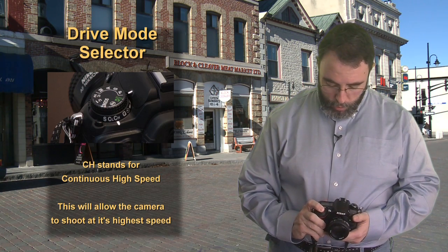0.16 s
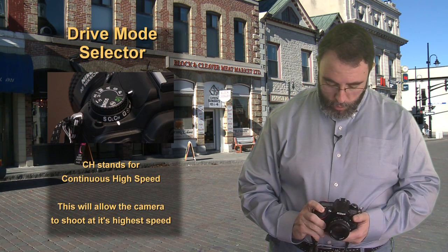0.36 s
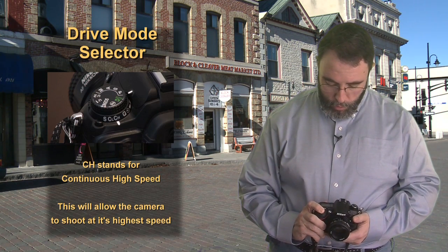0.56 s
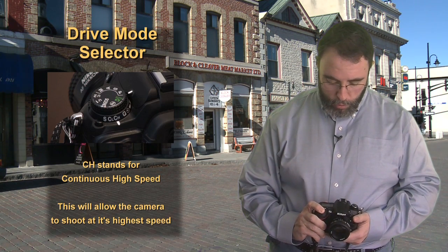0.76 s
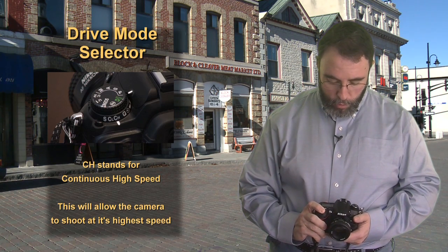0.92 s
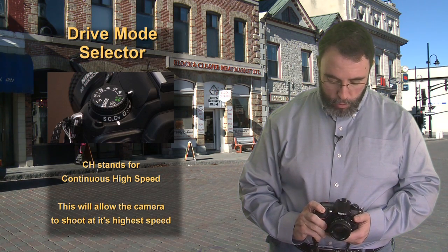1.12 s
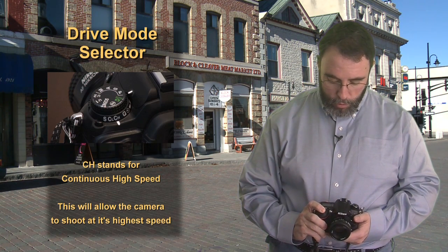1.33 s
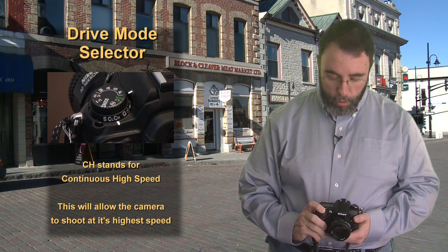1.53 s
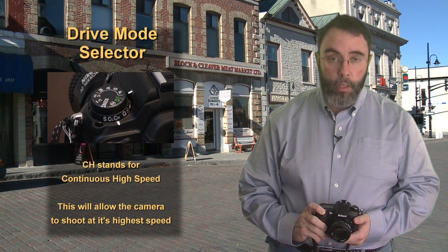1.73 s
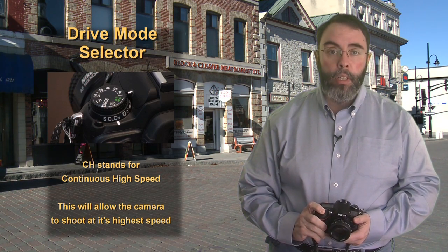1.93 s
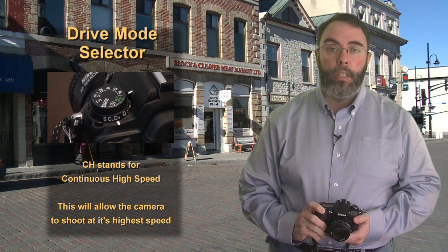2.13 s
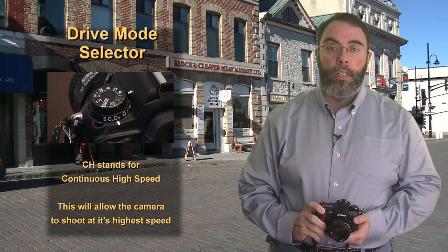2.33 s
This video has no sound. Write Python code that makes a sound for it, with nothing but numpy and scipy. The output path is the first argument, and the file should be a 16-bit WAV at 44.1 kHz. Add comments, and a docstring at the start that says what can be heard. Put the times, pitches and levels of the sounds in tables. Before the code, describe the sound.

A camera shutter fires a burst of ten shots, close to the microphone and slightly to the right. The tail of one clack sounds at the very start, with the next at 0.3 and 0.55 seconds. From there the crisp double clacks of shutter and mirror repeat evenly, about five a second, ending near 2 seconds. The room is dry, with only faint background noise.

```python
"""Reflex camera burst, close up

A dry room, a clip-on microphone close to a reflex camera firing about five frames a second.
Every frame is the same chain of contacts: magnet tick, latch, mirror up, two shutter curtains,
then the motor recocks and the mirror drops back. The body rings and the room answers briefly.
The camera sits a little to the right, over faint room tone."""
import sys
import numpy as np
from scipy import signal
from scipy.fft import rfft, irfft, next_fast_len
from scipy.io import wavfile
from scipy.ndimage import uniform_filter1d

SR = 44100
rng = np.random.default_rng(int(sys.argv[2]) if len(sys.argv) > 2 else 0)


def output_pcm(signal):
    """Save a mono or channel-first signal as 16-bit PCM at the path in sys.argv[1].

    Samples are clipped to [-1, 1] before scaling.
    """
    pcm = np.clip(np.atleast_2d(signal).T, -1, 1) * 32767
    wavfile.write(sys.argv[1], SR, np.round(pcm).astype(np.int16))


N = 104649
SIZE = 16384  # samples in one contact or impulse response

# One row a frame; delays count from the latch, mirror levels from level_db:
# latch_s, level_db, mirror_up_delay_s, mirror_up_db, shutter_delay_s, mirror_down_delay_s, mirror_down_db
FRAME_CUES = [(-.073, 0, .009, 0, 0.014, .0775, -2), (0.3005, 1, 0.0082, -1, 0.021, 0.073, -2),
              (0.5588, 0.5, 0.0083, 1, .0222, 0.074, -1.5), (0.7533, 1, .0088, -2, 0.022, 0.076, -2.5),
              (0.9446, 0.5, 0.0092, 1.5, 0.022, 0.076, -2), (1.1354, 1, .0088, 1, 0.022, 0.075, -0.5),
              (1.3203, 0.5, .0090, -1, .0227, .0772, 0), (1.5069, 1, 0.0089, 1, 0.023, 0.076, -2),
              (1.7017, 1, 0.0091, -1, 0.021, 0.072, -1.5), (1.8881, 0.5, 0.0087, 2.5, 0.022, 0.076, -2.5)]
# Spectrum of the recocking gear: frequency_hz, level_db
GEAR_COLOUR = [(100, -10.5), (350, -2), (900, -2), (1600, 5), (2200, -1), (2900, 1.5), (3600, -3),
               (5000, -2.5), (7500, -9), (9700, -8.5), (12000, -8), (15500, -14)]


def mechanism():
    """Magnet, latch, mirror, curtains, levers and pawls hit their stops in every frame."""
    # Spectrum of each part when struck: frequency_hz, level_db
    magnet = [(150, -35), (400, -18), (900, -14), (1300, 7), (2000, -8), (3000, -12), (4700, -1.5),
              (6500, -21), (9000, 1.5), (11000, -5.5), (16000, -23)]
    latch = [(100, -17), (330, 10), (460, -15.5), (670, 5.5), (790, -25.5), (1100, -7), (1400, 13),
             (1700, -7.5), (2000, 7), (2400, -2), (2900, 9), (3500, -6.5), (4250, 8), (4550, 0.5),
             (5000, 10), (6200, -2.5), (8900, -6.5), (9800, -1), (12000, -7.5), (15000, -9)]
    mirror_up = [(100, 0), (200, -9), (270, -1), (340, -7), (420, 9.5), (680, 9), (790, 4), (900, 10),
                 (1150, 9), (1450, 20), (1700, 19), (2080, 0), (2800, 11.5), (3200, -6), (4100, -12),
                 (5000, -1), (5800, -8), (8500, -1.5), (15000, -12)]
    first_curtain = [(100, -12.5), (300, -14), (490, -6), (900, 0), (1350, -1.5), (1500, 1), (1750, 14),
                     (2050, -5), (2600, -14.5), (2900, 8), (3400, -6), (4400, -0.5), (5000, 5.5),
                     (6000, -1), (7400, -5), (8400, 3), (9300, -12), (11000, -10), (15000, -6.5)]
    second_curtain = [(100, -14.5), (300, -2), (490, -5.5), (1300, 3), (1650, 14.5), (2100, -4.5),
                      (2900, 1), (3600, -8.5), (5000, 1.5), (6500, -0.5), (8000, -11), (9800, 2),
                      (12000, -3), (15000, -22.5)]
    mirror_down = [(100, -30.5), (220, -12.5), (330, 2), (450, 0), (700, -1), (860, -13.5), (1050, 2.5),
                   (1200, -7.5), (1460, 7.5), (1720, 9), (2050, -4), (2950, 3), (3400, -27.5),
                   (5000, -15.5), (15000, -13)]
    lever = [(150, -31), (330, -6), (480, -3), (900, -7), (1450, 7.5), (1750, 8.5), (2200, -0.5), (3300, 2),
             (4800, -3), (7000, -3), (10500, -8), (16000, -6.5)]
    # Light contacts of the release levers and the gear's pawls: after_latch_s, level_db, t60_s
    lever_hits = [(-.0305, -29, 0.019), (-.0185, -18, .02), (-.0112, -11.5, 0.036), (-.0075, -16, 0.004)]
    pawl_hits = [(0.0495, -7, .006), (0.069, -13.5, .008), (.072, -10.5, 0.0082), (0.078, -12, .008),
                 (0.086, -10, 0.008)]
    exposure_s = 0.0088
    latch_s, db, up_s, up_db, shutter_s, down_s, down_db = np.transpose(FRAME_CUES)
    out = strikes(latch_s - 0.0228, db - 10.5, magnet,
                  t60=0.0048, rise_s=0.00051, hold_s=0.00127, rattle_db=-8)
    out += strikes(latch_s - 0.0001, db + 0.12, latch,
                   t60=0.0076, rise_s=0.00046, hold_s=0.0014, rattle_db=-5.5)
    out += strikes(latch_s + up_s, db + up_db - 2.5, mirror_up,
                   t60=0.002, rise_s=0.00062, hold_s=0.00048, rattle_db=-5.5)
    out += strikes(latch_s + shutter_s, db + 1, first_curtain,
                   t60=0.0041, rise_s=0.0003, hold_s=0.0017, rattle_db=-5.5)
    out += strikes(latch_s + shutter_s + exposure_s, db - 0.8, second_curtain,
                   t60=0.0022, rise_s=0.00029, hold_s=0.0015, rattle_db=-7)
    out += strikes(latch_s + down_s, db + down_db + 1.5, mirror_down,
                   t60=0.0097, rise_s=0.0021, hold_s=0.0024, rattle_db=-10)
    for delay_s, hit_db, t60 in lever_hits:
        out += strikes(latch_s + delay_s, db + hit_db, lever,
                       t60, rise_s=0.001, hold_s=0.001, rattle_db=0.5)
    for delay_s, hit_db, t60 in pawl_hits:
        out += strikes(latch_s + delay_s, db + hit_db, GEAR_COLOUR,
                       t60, rise_s=0.0003, hold_s=0.001, rattle_db=0)
    return out


def strikes(times_s, levels_db, colour, t60, rise_s, hold_s, rattle_db):
    """One contact, repeated: a short crunch, nearly alike each time, and a rattle of small parts."""
    out, t = np.zeros(N), np.arange(SIZE) / SR
    tone = minimum_phase(colour)
    shared = rng.standard_normal((2, SIZE))
    variety = np.array([[0.35], [0.55]])  # fresh noise in each strike: crunch, rattle
    crunch_shape = np.minimum(t / rise_s, 1) * fade(np.maximum(t - rise_s - hold_s, 0), t60)
    rattle_shape = fade(t, t60=0.07) * (1 - fade(t, t60))
    for start_s, db in zip(times_s, levels_db):
        crunch, rattle = shared + variety * rng.standard_normal((2, SIZE))
        for _ in range(2):  # keep the crunch both short and even in spectrum
            crunch = irfft(flat_spectrum(crunch * crunch_shape, bins=61))
        crunch *= np.sqrt(crunch_shape)
        rattle *= grain(SIZE, depth_db=4, span=50)
        contact = rfft(crunch) / np.linalg.norm(crunch)
        contact += amp(rattle_db) * flat_spectrum(rattle * rattle_shape, bins=201)
        add(out, amp(db) * irfft(tone * contact)[:SIZE // 2], start_s)
    return out


def body(x):
    """The camera's shell rings on after every contact and gives out a little less around 200-300 Hz."""
    # Shell resonances: pitch_hz, level_db, t60_s
    modes = [(432, -7, 0.13), (464, 1, 0.2), (577, -3.5, 0.14), (688, -4.5, 0.097), (891, -4.5, 0.21),
             (1065, -3, 0.22), (1477, -8.5, 0.082), (1605, -22, 0.24), (1733, -11, 0.055),
             (1834, -9, 0.076), (2650, -9, 0.084), (4880, -6, 0.029)]
    # How well the shell radiates: frequency_hz, gain_db
    radiation = [(60, -1), (200, -4.5), (310, -4), (420, 0), (1000, 0)]

    def response(hz):
        ringing = 0
        for pitch_hz, db, t60 in modes:
            width_hz = np.log(1000) / np.pi / t60
            damping = 1j * hz * width_hz
            ringing += amp(db) * damping / (pitch_hz ** 2 - hz ** 2 + damping)
        return (1 + ringing) * amp(along(radiation, hz))
    return filtered(x, response)


def motor():
    """The gear train whirrs while it recocks the shutter after each latch."""
    delay_s, run_s, ramp_s = 0.034, 0.058, 0.0069
    t = np.arange(N) / SR - delay_s
    running = np.zeros(N)
    for latch_s, db, *_ in FRAME_CUES:
        inside_s = np.minimum(t - latch_s, latch_s + run_s - t)
        running += amp(db) * np.clip(inside_s / ramp_s + 0.5, 0, 1)
    teeth = grain(N, depth_db=6.5, span=40)
    return amp(-38) * running * unit(teeth * noise(GEAR_COLOUR))


def button():
    """The finger makes tiny ticks on the shutter button."""
    # Finger contacts: start_s, level_db
    ticks = [(.196, -36), (.207, -36), (.222, -38), (.252, -31.5)]
    # Spectrum of a tick: frequency_hz, level_db
    colour = [(200, -24), (1500, -18), (3500, -4), (9000, 5.5), (16000, 4)]
    return strikes(*np.transpose(ticks), colour, t60=0.0012, rise_s=1e-4, hold_s=1e-4, rattle_db=-3.5)


def recoil():
    """Each swing of the mirror shakes the body with a low thump."""
    # Spectrum of the thump: frequency_hz, level_db
    thump = [(15, 5), (36, 9), (55, -16), (110, -18), (300, -82), (1000, -100)]
    up_s, down_s, width_s = 0.021, 0.08, 0.032
    swings = sum(swell(latch_s + up_s, width_s) + amp(-5) * swell(latch_s + down_s, width_s)
                 for latch_s, *_ in FRAME_CUES)
    return noise(thump) * swings


def grip():
    """The hand rubs once on the camera."""
    # Spectrum of the rub: frequency_hz, level_db
    colour = [(300, -1), (1000, -15.5), (1400, 0.5), (1800, -16), (2250, -3.5), (3000, -21), (14000, -16)]
    return noise(colour) * swell(peak_s=0.14, width_s=0.035)


def room(x):
    """The walls return a short diffuse tail; the bass lasts longest."""
    # Decay of the room: frequency_hz, t60_s
    decay = [(100, .3), (500, 0.28), (1500, 0.18), (5000, 0.18), (15000, 0.22)]
    hz, t, bands = signal.stft(rng.standard_normal(SIZE), SR, nperseg=256)
    bands *= 1000.0 ** (-t / along(decay, hz)[:, None])
    tail = signal.istft(bands, SR, nperseg=256)[1][:SIZE]
    tail = irfft(flat_spectrum(tail, bins=81))[:SIZE * 3 // 4]
    return signal.fftconvolve(x, np.pad(tail, (200, 0)))[:N]  # 4.5 ms behind the direct sound


def room_tone():
    """Steady low noise behind the camera."""
    # Spectrum of the background: frequency_hz, level_db
    colour = [(15, -30), (30, -16), (60, -3), (110, 0), (200, -8), (400, -7), (560, -7), (900, -12.5),
              (1200, -8), (1450, -14.5), (2000, -22), (2800, -20), (3600, -26), (14000, -28), (16000, -42)]
    return noise(colour)


def microphone(mid):
    """The stereo image leans to the right and widens in the treble."""
    # Level of the diffuse side signal: frequency_hz, gain_db
    width = [(300, -39), (1500, -27), (5000, -21.5), (14000, -12)]
    # Channel balance: frequency_hz, left_over_right_db
    balance = [(100, -5), (2000, -4.5), (5000, -4.5), (9000, -4), (14000, -1.8)]
    burst = rng.standard_normal(SIZE) * fade(np.arange(SIZE) / SR, t60=0.036)
    scatter = irfft(flat_spectrum(burst, bins=81))
    side = filtered(signal.fftconvolve(mid, scatter)[:N], lambda hz: amp(along(width, hz)))
    pair = np.array([mid + side, mid - side])
    return filtered(pair, lambda hz: amp(np.outer([0.5, -0.5], along(balance, hz))))


def amp(db):
    """Decibels to gain."""
    return 10 ** (np.asarray(db) / 20)


def unit(x):
    """Scale to rms 1."""
    return x / np.sqrt(np.mean(x ** 2) + 1e-20)


def along(points, hz):
    """Interpolate (frequency_hz, value) points on a log frequency axis."""
    points_hz, values = np.transpose(points)
    return np.interp(np.log(hz + 1), np.log(points_hz + 1), values)


def filtered(x, response):
    """Filter x by a gain given as a function of frequency."""
    size = next_fast_len(N + SR // 2)
    return irfft(rfft(x, size) * response(np.fft.rfftfreq(size, 1 / SR)), size)[..., :N]


def noise(colour):
    """Coloured noise of rms 1."""
    return unit(filtered(rng.standard_normal(N), lambda hz: amp(along(colour, hz))))


def grain(length, depth_db, span):
    """A gain that flickers at random, smoothed over span samples."""
    return amp(depth_db * unit(uniform_filter1d(rng.standard_normal(length), span)))


def minimum_phase(colour):
    """Frequency response of the given colour that rings only after the strike."""
    cepstrum = irfft(np.log(amp(along(colour, np.fft.rfftfreq(SIZE, 1 / SR)))))
    cepstrum[1:SIZE // 2] *= 2
    cepstrum[SIZE // 2 + 1:] = 0
    return np.exp(rfft(cepstrum))


def fade(t, t60):
    """Exponential decay, 60 dB down after t60 seconds."""
    return np.exp(-np.log(1000) * t / t60)


def swell(peak_s, width_s):
    """A bell-shaped rise and fall."""
    return np.exp(-((np.arange(N) / SR - peak_s) / width_s) ** 2)


def flat_spectrum(x, bins):
    """Spectrum of x, levelled by its local mean power."""
    spectrum = rfft(x)
    power = np.abs(uniform_filter1d(np.abs(spectrum) ** 2, bins))
    return spectrum / np.sqrt(power + 1e-12)


def add(out, x, start_s):
    """Mix x into out at start_s."""
    start = int(round(start_s * SR))
    first, end = max(start, 0), min(start + len(x), N)
    if end > first:
        out[first:end] += x[first - start:end - start]


def scene():
    """The camera close up, with the room and faint handling noise beneath it."""
    camera = body(mechanism() + button() + motor())
    ambience = amp(-14) * room(camera) + amp(-56.5) * room_tone()
    handling = amp(-50) * (recoil() + grip())
    return microphone(camera + ambience + handling)


def record(dry):
    """The recorder keeps nothing above 16.1 kHz."""
    return filtered(dry, lambda hz: hz < 16100)


dry = scene()
out = record(dry)
output_pcm(out)
```